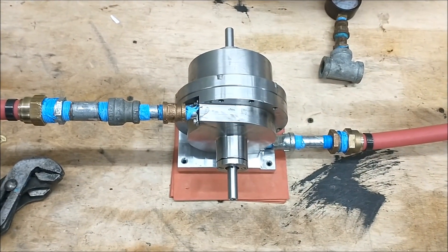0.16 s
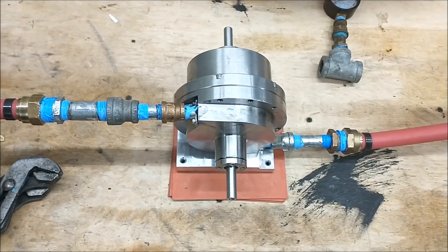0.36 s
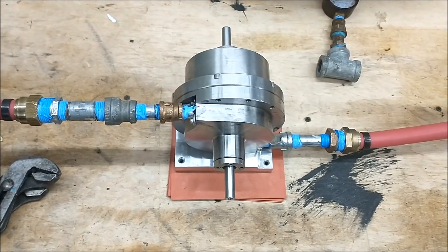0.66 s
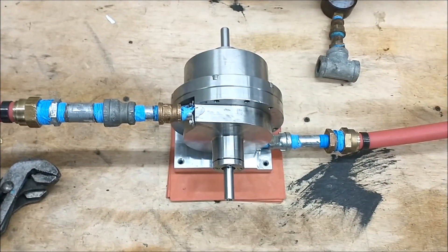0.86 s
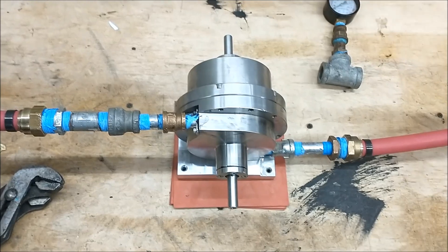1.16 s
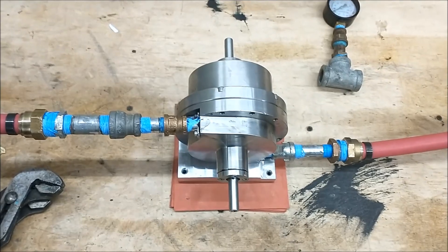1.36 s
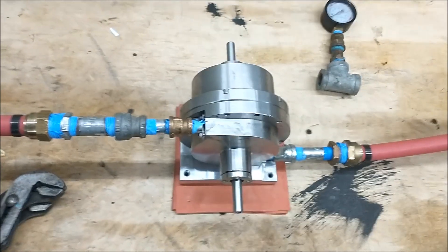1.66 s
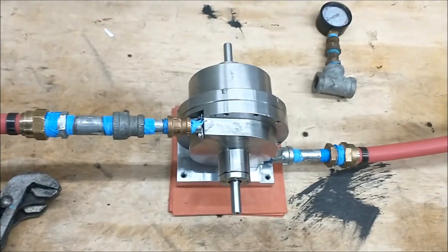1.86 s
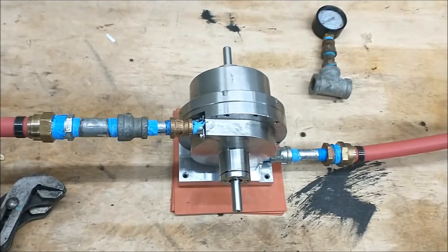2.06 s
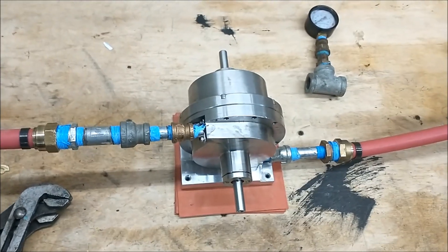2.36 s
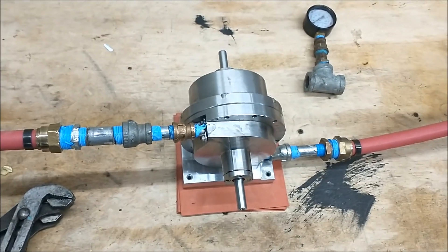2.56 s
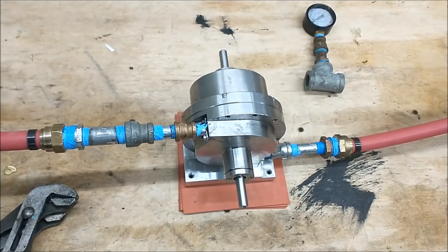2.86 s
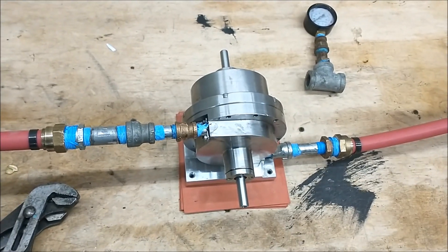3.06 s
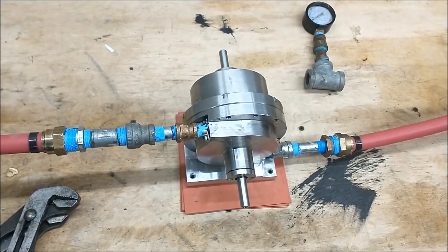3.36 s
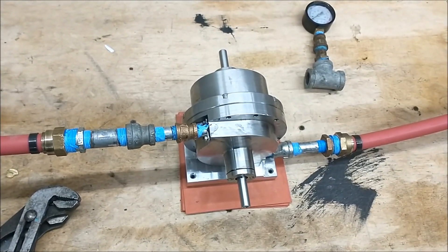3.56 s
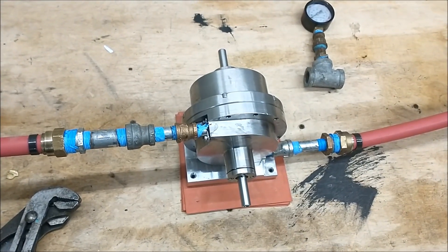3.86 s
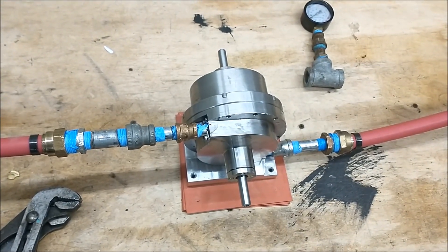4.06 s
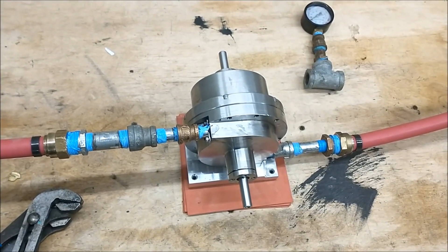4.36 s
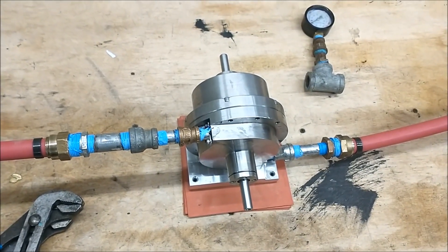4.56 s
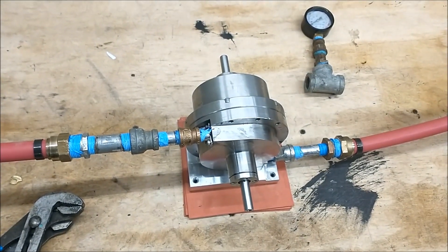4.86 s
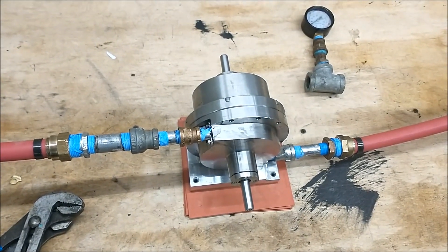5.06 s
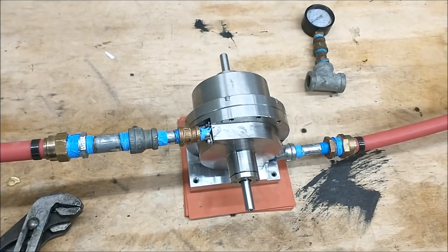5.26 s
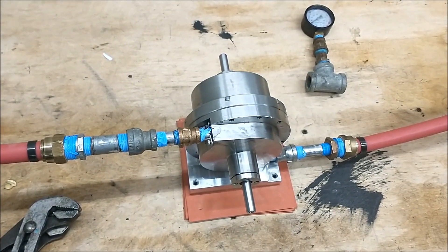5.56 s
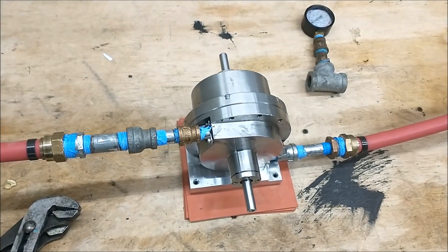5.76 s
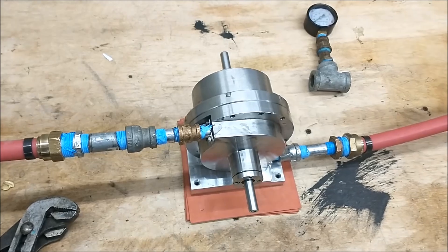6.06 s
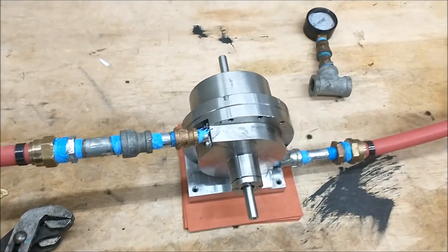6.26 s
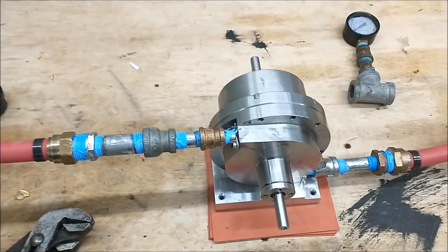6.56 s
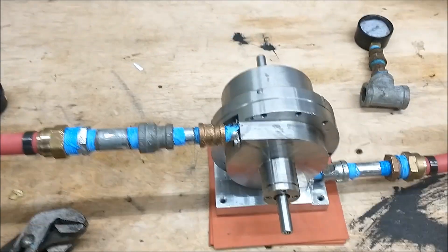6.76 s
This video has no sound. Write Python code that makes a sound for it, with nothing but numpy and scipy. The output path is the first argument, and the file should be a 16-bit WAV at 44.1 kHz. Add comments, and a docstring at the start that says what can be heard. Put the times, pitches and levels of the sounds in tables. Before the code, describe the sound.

Air hisses through a small turbine with a rising whine, shuts off, and leaves the bearings droning until they chatter metallically.

```python
"""A small steel disc turbine runs on compressed air on a workbench, close to a stereo microphone.
A blast of air eases to a steady hiss while the rotor speeds up, its discs chopping the air into a whine.
At about four seconds the valve closes with a hoarse note; the rotor coasts on, its ball bearings
droning, until it works loose and they chatter against the housing. In the background are three brief
ticks and one soft bump on the wooden bench."""
import sys
import numpy as np
from scipy import signal
from scipy.fft import rfft, irfft
from scipy.io import wavfile

SR = 44100
rng = np.random.default_rng(int(sys.argv[2]) if len(sys.argv) > 2 else 0)


def generate_wav(sig):
    """Save sig (samples, or channels by samples) to the path in sys.argv[1] as 16-bit PCM at SR."""
    pcm = np.round(np.clip(np.atleast_2d(sig).T, -1, 1) * 32767).astype(np.int16)
    wavfile.write(sys.argv[1], SR, pcm)


N = 304731
TIME, FREQS = np.arange(N) / SR, np.fft.rfftfreq(N, 1 / SR)
BLAST_END_S, CLOSING_S, SHUT_S = 0.865, 3.356, 4.149
START_SPEED = 32.964  # turns/s
BALL_PASSES, CAGE_SWINGS = 5.28, 0.28  # per turn of the rotor


def rotor_speed(blast_push=3.417, jet_push=2.884, friction=0.398):
    """Speed in turns/s: blast and jet push the rotor against a little friction (each in turns/s^2)."""
    push = blast_push * (TIME < BLAST_END_S) + jet_push * opening() - friction
    return START_SPEED + np.cumsum(push) / SR


def looseness(start_s=5.3, over_s=1):
    """0 while the rotor runs true, 1 once it has worked loose in its bearings."""
    return np.clip((TIME - start_s) / over_s, 0, 1)


# Case, bench and room resonances at the microphone: f/Hz, width/Hz, lift/dB, left minus right/dB
WHINE_MODES = [(269.2, 15.7, 8.9, 0.7), (291.5, 26.9, 14.9, 2.7), (311.5, 8, -2.8, 0),
               (324.4, 12.5, 14.1, 0.2), (335.9, 10.7, 9.3, 0.3), (344.6, 8.3, 5.2, -2.7),
               (359.7, 14, 14.7, -2.2)]
def whine(turns, speed, base_db=-43.5, waver_db=0.67, left_lead_rad=0.19):
    """The discs chop the air eight times a turn; the tone swells in resonances, fades with the valve."""
    phase, pitch = 2 * np.pi * 8 * turns, 8 * speed
    lift_db = [lift([(hz, width, db + side * lean) for hz, width, db, lean in WHINE_MODES], pitch)
               for side in (.5, -.5)]
    level_db = base_db + np.array(lift_db) + waver_db * drift(48)
    return opening() * amp(level_db) * np.sqrt(2) * np.sin([phase + left_lead_rad, phase])


# Shaft and bearing tones: multiple of rotor speed, base level/dB when driven, coasting, loose
BEARING_TONES = [(1.0, -83.5, -74.0, -74.0), (2.0, -59.5, -61.0, -62.0), (3.0, -62.0, -67.5, -69.5),
                 (4.0, -71.5, -73.0, -72.5), (5.28, -64.5, -69.5, -66.0), (6.28, -75.0, -73.0, -71.5),
                 (7.28, -64.5, -77.0, -73.0), (8.0, -68.0, -66.5, -70.0), (8.28, -72.5, -69.0, -85.5),
                 (8.56, -72.0, -69.0, -67.0), (8.84, -74.0, -69.5, -76.5), (9.28, -63.5, -71.5, -74.5),
                 (9.56, -63.0, -86.0, -72.0), (10.56, -65.5, -60.0, -64.5), (11.56, -66.0, -55.0, -58.0),
                 (11.84, -69.5, -60.0, -62.5), (12.12, -78.0, -67.5, -77.0), (12.56, -65.0, -56.0, -60.5),
                 (12.84, -61.5, -67.0, -67.0), (13.12, -76.0, -77.5, -82.0), (13.56, -62.5, -64.0, -61.5),
                 (13.84, -59.0, -57.5, -57.0), (14.12, -69.0, -80.5, -69.5), (14.56, -64.5, -68.5, -70.5),
                 (14.84, -77.0, -64.5, -59.5), (15.12, -72.5, -77.0, -80.0), (15.84, -62.5, -63.5, -64.0),
                 (16.12, -79.5, -85.5, -66.0), (16.56, -78.0, -71.0, -67.0), (16.84, -65.5, -67.5, -64.5),
                 (17.84, -62.5, -73.0, -70.5), (18.12, -77.0, -69.5, -67.5), (18.56, -78.0, -77.0, -68.5),
                 (19.12, -77.5, -71.5, -72.5), (19.84, -78.5, -68.5, -74.0), (20.84, -77.5, -69.5, -67.0),
                 (21.12, -66.0, -64.5, -75.5), (21.4, -79.0, -68.5, -88.0), (21.84, -76.5, -72.0, -73.0),
                 (22.4, -74.5, -71.5, -72.5), (24.4, -80.0, -73.0, -83.0), (25.12, -73.5, -75.0, -76.0),
                 (29.85, -73.5, -71.0, -71.0), (35.96, -71.0, -69.0, -68.5), (36.96, -75.5, -63.0, -62.0),
                 (37.96, -67.5, -67.5, -66.5), (39.59, -76.0, -66.5, -63.5), (42.23, -68.5, -65.0, -62.5),
                 (45.3, -80.0, -65.0, -66.0), (52.79, -72.5, -67.5, -63.5), (53.01, -75.5, -60.0, -58.0),
                 (54.01, -73.5, -63.5, -62.0), (55.01, -69.5, -56.5, -52.5), (65.75, -81.0, -62.0, -63.0)]
# Resonances of the turbine on its mount: f/Hz, width/Hz, lift/dB
MOUNT_MODES = [(204, 26, 14.5), (325, 60, 5), (631, 32, 12)]
# Spells when one tone sings out: multiple of rotor speed, start t/s, end t/s, rise/dB
TONE_SPELLS = [(5.28, 1.4, 2.0, 2.5), (15.84, 1.28, 1.7, 8.5), (15.84, 1.75, 2.05, 7.5),
               (14.56, 2.72, 3.03, 6)]
def drone(turns, speed, blast_db=3.5, closing_db=3, chug_db=1.0, waver_db=0.97, left_db=0.5):
    """Shaft and bearing tones glide through the mount's resonances; the high ones chug with the cage."""
    out, driven, loose = np.zeros((2, N)), opening(), looseness()
    boost_db = blast_db * blast_gate() + closing_db * np.sin(np.pi * driven)
    for order, driven_db, coasting_db, loose_db in BEARING_TONES:
        phase = 2 * np.pi * (order * turns + rng.random())
        phase += 0.046 * np.sqrt(order) * drift(6.9)  # slip
        db = coasting_db + driven * (driven_db - coasting_db) + loose * (loose_db - coasting_db)
        db += boost_db + lift(MOUNT_MODES, order * speed) + waver_db * drift(5.8)
        db += sum(rise * swell(start, end, attack_s=0.15, release_s=0.31)
                  for tone, start, end, rise in TONE_SPELLS if tone == order)
        db += chug_db * (order > 10) * (1 - driven) * np.cos(2 * np.pi * CAGE_SWINGS * turns)
        offset = 0.38 * rng.standard_normal() * order / 20  # higher tones reach the two sides less alike
        out += amp(db) * np.sqrt(2) * np.sin([phase + offset, phase - offset])
    return out * amp([[left_db / 2], [-left_db / 2]])


def race(turns, fresh, count=4, size=1024):
    """The same rough tracks pass under the balls each turn, pressed by the cage, with some fresh grit."""
    tracks = rng.standard_normal((count, size))[:, (turns % 1 * size).astype(int)]
    cage_cycles = np.arange(count)[:, None] * CAGE_SWINGS * turns + rng.random((count, 1))
    roughness = (tracks * np.cos(2 * np.pi * cage_cycles)).sum(0)
    return unit(unit(roughness) + fresh * rng.standard_normal(N))


# Spectrum of the rolling balls: f/Hz, level/dB
ROLLING_COLOUR = [(25, -15), (60, -12), (130, -2.5), (250, -5), (430, -4), (620, 8.5), (850, -3),
                  (1300, -2), (1750, 0.5), (2100, -4.5), (3000, -3.5), (4000, -24.5), (8000, -31),
                  (15500, -34.5)]
# Its resonances: f/Hz, width/Hz, lift/dB
ROLLING_MODES = [(337, 80, 8.8), (980, 70, 2.1), (1097, 58, 6.7), (2070, 27, 3.5), (1330, 120, 2),
                 (2480, 210, 3.6), (3600, 240, 5.5), (6050, 250, 5.9), (9020, 1600, 11.7), (9000, 250, 4.3),
                 (11800, 450, 3)]
# Its image at the microphone: f/Hz, left minus right/dB; and f/Hz, side minus mid/dB
ROLLING_BALANCE = [(60, -5), (110, -6), (200, 8.5), (380, -3), (700, 2.5), (1290, -1.5), (2380, -5.5),
                   (4400, 7.5), (8120, -3.5), (15000, -1)]
ROLLING_SIDE = [(60, -18), (110, -3), (200, -10), (380, -4.5), (700, 2), (1290, -7.5), (2380, 7), (4400, 1),
                (8120, -2.5), (15000, -1)]
def rolling(turns, coasting_db=-46, load_db=1.5):
    """The balls roll grittily, pulsing faintly twice a turn and with each ball, louder under load."""
    pulses = 1 + .08 * np.cos(2 * np.pi * 2 * turns) + .12 * np.cos(2 * np.pi * BALL_PASSES * turns)
    grit = pulses * np.array([race(turns, fresh=1.56) for _ in range(2)])
    colour_db = read(ROLLING_COLOUR) + lift(ROLLING_MODES, FREQS)
    load = np.clip(opening() + 0.32 * looseness(), 0, 1)  # first the air, later the loose rotor
    return amp(coasting_db + load_db * load) * stereo_noise(colour_db, ROLLING_BALANCE, ROLLING_SIDE, grit)


def knocks(turns, jitter_turns=0.0012, uneven_db=1.7, grit=2.3):
    """The rotor strikes once a turn over the grit of the race, and throbs with the cage."""
    whole_turns = np.arange(1, turns[-1] - 1)
    late, size = rng.standard_normal((len(whole_turns), 2)).T
    onsets = np.searchsorted(turns, whole_turns + jitter_turns * late)
    strikes = np.bincount(onsets, amp(uneven_db * size), N)
    throb = 1 + 0.097 * np.cos(2 * np.pi * CAGE_SWINGS * turns)
    return (unit(strikes) + grit * race(turns, fresh=1.0)) * throb


# Resonances of the steel housing: f/Hz, width/Hz, level/dB
HOUSING_MODES = [(1113, 90, -16.5), (1790, 150, -19), (2360, 65, 2), (2428, 41, 2), (2560, 34, 6.5),
                 (2923, 88, -5.5), (3540, 350, -27), (4170, 110, -34), (8600, 480, -37.5)]
# Bouts of chatter: start t/s, end t/s, left bearing level/dB, right bearing level/dB
CHATTER_BOUTS = [(3.25, 3.602, -69, -48.5), (3.75, 5.9, -54, -54), (5.97, 6.91, -40.5, -49.5),
                 (6.144, 6.417, -45, -46), (6.31, 6.624, -37, -55), (6.684, 6.91, -33, -46)]
def chatter(turns, spill=0.084):
    """Each bearing's knocks ring the housing on its own side of the microphone and spill to the other."""
    power = sum((amp([[left_db], [right_db]]) * swell(start, end, attack_s=0.2, release_s=0.1)) ** 2
                for start, end, left_db, right_db in CHATTER_BOUTS)
    sides = np.array([force * ring(knocks(turns), HOUSING_MODES) for force in np.sqrt(power)])
    return sides + spill * sides[::-1]


def blast_gate(release_s=0.059):
    """1 while the first blast blows, then a quick release."""
    return np.exp(-np.maximum(TIME - BLAST_END_S, 0) / release_s)


def opening():
    """The valve: 1 wide open, turned steadily down to 0."""
    return np.clip((SHUT_S - TIME) / (SHUT_S - CLOSING_S), 0, 1)


def pinch(start_s=3.875, fall_db_per_s=150, knee_s=0.06, room_db=-14, room_db_per_s=70):
    """Full flow until the valve bites, then a rounded knee into a fall, with a faint tail in the room."""
    late = knee_s * np.logaddexp(0, (TIME - start_s) / knee_s)
    return np.maximum(amp(-fall_db_per_s * late), amp(room_db - room_db_per_s * late))


# Spectrum of the blast, close up: f/Hz, level/dB
BLAST_COLOUR = [(60, -4), (200, -11.5), (500, -4), (900, -6), (1200, -4), (1700, -1), (2200, -3.5),
                (3300, -5), (4300, -10), (7000, -12), (9000, -8.5), (11000, -8), (12000, -12.5),
                (15000, -14)]
# Pipe resonances: f/Hz, width/Hz, lift/dB
BLAST_PIPES = [(1108, 50, 6), (1264, 50, 6), (1354, 64, 8.5), (1800, 55, 1), (2056, 65, 7.5),
               (2204, 60, 5.5), (2495, 40, 6), (2685, 55, 5.5), (2790, 50, 2.5), (3050, 200, -0.5),
               (3290, 90, 3), (3420, 70, 6), (3570, 70, 4), (3960, 80, 4.5), (5400, 290, 3.5),
               (8620, 200, 5), (9100, 250, 1), (9550, 300, 7.5), (10660, 260, -11), (11700, 350, -6.5),
               (14700, 300, 7)]
# Its image at the microphone: f/Hz, left minus right/dB; and f/Hz, side minus mid/dB
BLAST_BALANCE = [(60, 6), (110, -11), (200, 16.5), (380, -6.5), (700, 3), (1290, 5), (2380, 4.5),
                 (4400, 2.5), (8120, 2.5), (15000, -1.5)]
BLAST_SIDE = [(60, -2), (110, -17), (200, -7), (380, -3), (700, -4.5), (1290, -3), (2380, -0.5), (4400, 5),
              (8120, 1), (15000, -3.5)]
def blast(level_db=-19, hold_s=0.15, sag_db_per_s=14, low_cut_hz=110):
    """The first rush of air: turbulence coloured by the pipes, sagging as the pressure drops."""
    low_cut_db = -10 * np.log10(1 + (low_cut_hz / (FREQS + 1)) ** 4)
    colour_db = read(BLAST_COLOUR) + lift(BLAST_PIPES, FREQS) + low_cut_db
    noise = stereo_noise(colour_db, BLAST_BALANCE, BLAST_SIDE, rng.standard_normal((2, N)))
    return amp(level_db - sag_db_per_s * np.maximum(TIME - hold_s, 0)) * blast_gate() * noise


# Spectrum of the jet, close up: f/Hz, level/dB
JET_COLOUR = [(30, -22), (70, 1.5), (130, -6), (350, 11.5), (480, -.5), (660, 6), (780, 3.5), (1000, -1),
              (1200, 8), (1400, 5), (1750, 1.5), (2000, -4.5), (3200, -6), (5000, 2), (7000, -1.5),
              (9000, 3.5), (11500, -2.5), (15000, -1.5)]
# Resonances of pipes and case: f/Hz, width/Hz, lift/dB
JET_PIPES = [(129, 18, 17.5), (1144, 52, 4), (1360, 50, 9), (1516, 31, 3.5), (2422, 62, 14),
             (2577, 38, 9.5), (2920, 32, 2), (4480, 220, 1), (5800, 400, -1), (6820, 160, 3.5),
             (12600, 300, 0), (13600, 900, 2.5), (14600, 500, 2.5)]
# Its image at the microphone: f/Hz, left minus right/dB; and f/Hz, side minus mid/dB
JET_BALANCE = [(60, -4), (110, -1), (200, 0), (380, 0), (700, 4), (1290, 0), (2380, 6), (4400, 3.5),
               (8120, -2), (15000, 0.5)]
JET_SIDE = [(60, -4), (110, -17), (200, -5), (380, -17), (700, -25), (1290, -1), (2380, -5), (4400, 4),
            (8120, 1), (15000, 0)]
def jet(steady_db=-35, blast_db=4, surge_db=2, fizz_hz=11500):
    """The turbulent jet swells a little with the supply; as the valve narrows, it thins to a fizz."""
    surge = swell(1.34, 1.68, attack_s=0.18, release_s=0.57)
    level = amp(steady_db + blast_db * blast_gate() + surge_db * surge)
    colour_db = read(JET_COLOUR) + lift(JET_PIPES, FREQS)
    noise = stereo_noise(colour_db, JET_BALANCE, JET_SIDE, rng.standard_normal((2, N)))
    fizz = irfft(rfft(noise) * (FREQS > fizz_hz), N)
    return level * (pinch() * (noise - fizz) + pinch(start_s=3.865, fall_db_per_s=105) * fizz)


# Bright bands in the jet after the blast: starting f/Hz, fall/(Hz/s), half width/Hz, level/dB
EDGE_BANDS = [(5640, 290, 240, -46.5), (3950, 200, 1400, -43)]
def jet_edge(start_s=0.7, end_s=1.44):
    """Bands of bright hiss sink in pitch and fade as the jet settles."""
    bands = sum(amp(db) * band(hz - fall * (TIME - start_s), width, channels=2)
                for hz, fall, width, db in EDGE_BANDS)
    return swell(start_s, end_s, attack_s=0.71, release_s=0.55) * bands


# Spells of nozzle whistle: start t/s, end t/s, f/Hz at the starting speed, half width/Hz, level/dB
WHISTLES = [(0.05, 0.75, 9090, 270, -36), (0.9, 1.32, 9150, 230, -42.5), (1.82, 3.56, 9230, 240, -45.5),
            (1.63, 3.4, 8700, 130, -52), (2.0, 3.4, 10440, 150, -54)]
def whistle(speed, shared=0.65):
    """Breathy bands of turbulence at the nozzle creep up in pitch as the rotor gains speed."""
    out = np.zeros((2, N))
    rise_hz = 32.7 * (speed - START_SPEED)
    for start, end, hz, width, db in WHISTLES:
        noise = band(hz + rise_hz, width, channels=3)
        stereo = unit(shared * noise[2] + (1 - shared) * noise[:2])
        out += amp(db) * swell(start, end, attack_s=0.3, release_s=0.25) * stereo
    return out * pinch()


# Resonances of the closing valve, and of its shrill upper band: f/Hz, width/Hz, level/dB
VALVE_MODES = [(1130, 180, 0), (1390, 81, 7.5), (1740, 90, 3)]
SHRILL_MODES = [(4660, 300, 0), (4720, 700, -3)]
def valve(level_db=-42.5):
    """The closing valve sings hoarsely; its shrill upper band dies with the jet."""
    sing = ring(rng.standard_normal((2, N)), VALVE_MODES)
    shrill = pinch() * ring(rng.standard_normal((2, N)), SHRILL_MODES)
    return amp(level_db) * swell(3.5, 3.895, attack_s=0.08, release_s=0.13) * (sing + shrill)


# Sharp ticks, right of centre: t/s, level/dB, right minus left/dB, starting f/Hz, final f/Hz
TICKS = [(1.7377, -23.4, 12, 10000, 1100), (6.389, -53, 6, 14000, 7000), (6.475, -58, 6, 14000, 7000)]
def ticks(length_s=0.0015):
    """Each tick is a very brief chirp, falling from the high treble."""
    out, t = np.zeros((2, N)), np.arange(int(length_s * SR)) / SR
    for at_s, db, right_db, start_hz, end_hz in TICKS:
        pitch = start_hz * (end_hz / start_hz) ** (t / length_s)
        chirp = np.sin(2 * np.pi * np.cumsum(pitch) / SR) * signal.windows.tukey(len(t), .2)
        start = round(at_s * SR)
        out[:, start:start + len(t)] += amp([[db - right_db / 2], [db + right_db / 2]]) * chirp
    return out


# Modes of the bench under the turbine: f/Hz, level/dB, t60/s
BENCH_MODES = [(125, 2, 0.082), (165, -10, 0.19), (240.5, -7, 0.33), (253, 9, 0.11)]
def bump(at_s=2.628, gain_db=-24, rise_s=0.026):
    """A soft push rings the wooden bench."""
    t = np.maximum(TIME - at_s, 0)
    modes = sum(amp(db - 60 * t / t60) * np.sin(2 * np.pi * hz * t) for hz, db, t60 in BENCH_MODES)
    return amp(gain_db) * (1 - np.exp(-t / rise_s)) * modes


def stereo_noise(colour_db, balance, side, source, port_delay_s=4 / SR):
    """Gives two channels of white noise a colour and a stereo image at the microphone."""
    mid, diffuse = rfft(source) * amp(colour_db)
    # sound reaches the left port first, which turns the side signal a quarter cycle
    lead = np.pi / 2 * np.sign(np.sin(2 * np.pi * FREQS * port_delay_s))
    # near reflections scatter that phase from pitch to pitch; the room adds a diffuse part
    knots_hz = np.arange(0, SR / 2, 150)
    scatter = np.interp(FREQS, knots_hz, rng.standard_normal(len(knots_hz)))
    wide = amp(read(side)) * (.84 * diffuse + .54 * mid * np.exp(1j * (lead + scatter)))
    lean = amp(read(balance) / 2)
    return unit(irfft(np.array([(mid + wide) * lean, (mid - wide) / lean]), N))


def band(pitch, width_hz, channels):
    """Narrow noise that follows a pitch curve, unrelated in each channel."""
    noise = rng.standard_normal((channels, N)) + 1j * rng.standard_normal((channels, N))
    wobble = signal.sosfilt(signal.butter(2, width_hz, fs=SR, output="sos"), noise)
    return unit((wobble * np.exp(2j * np.pi * np.cumsum(pitch) / SR)).real)


def ring(x, modes):
    """Passes x through a bank of steep-sided resonances; the result has an rms of one."""
    response = sum(amp(db) / (1 + 1j * (FREQS - hz) / width) ** 3 for hz, width, db in modes)
    return unit(irfft(rfft(x) * response, N))


def lift(modes, hz):
    """The dB that resonances add at the given frequencies."""
    return sum(db / (1 + (2 * (hz - centre) / width) ** 2) for centre, width, db in modes)


def read(points):
    """A spectrum table interpolated to every frequency."""
    hz, value = np.transpose(points)
    return np.interp(np.log(FREQS + 1), np.log(hz + 1), value)


def swell(start, end, attack_s, release_s):
    """An envelope that rises in a straight line, holds until the end, then dies away."""
    return np.clip((TIME - start) / attack_s, 0, 1) * np.exp(-np.maximum(TIME - end, 0) / release_s)


def drift(rate):
    """A smooth random wander of rms one, with about rate new values a second."""
    knots = np.arange(0, TIME[-1] + 1, 1 / 200)
    lowpass = signal.butter(2, rate / 2, fs=200, output="sos")
    slow = signal.sosfilt(lowpass, rng.standard_normal(len(knots)))
    return np.interp(TIME + 1, knots, unit(slow))


def amp(db):
    """Decibels to gain."""
    return 10 ** (np.asarray(db) / 20)


def unit(x):
    """Scales to an rms of one."""
    return x / np.sqrt(np.mean(x ** 2) + 1e-20)


def scene(flutter_db=0.65):
    """At the bench: the air supply sets the rotor's speed, and that speed drives every turning part."""
    speed = rotor_speed()
    turns = np.cumsum(speed) / SR
    rotor = whine(turns, speed) + drone(turns, speed) + rolling(turns) + chatter(turns)
    air = (blast() + jet() + jet_edge() + valve()) * amp(flutter_db * drift(29.5))
    return rotor + air + whistle(speed) + ticks() + bump()


def record(dry):
    """The recorder behind the close microphone cuts off at 15.8 kHz."""
    lowpass = signal.firwin(801, 15800, window=("kaiser", 9), fs=SR)
    return signal.oaconvolve(dry, lowpass[None], "same")


dry = scene()
out = record(dry)
generate_wav(out)
```